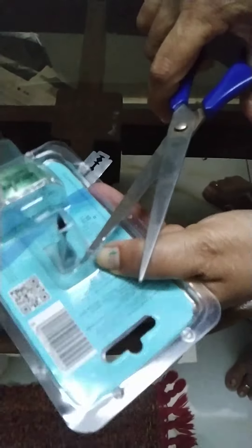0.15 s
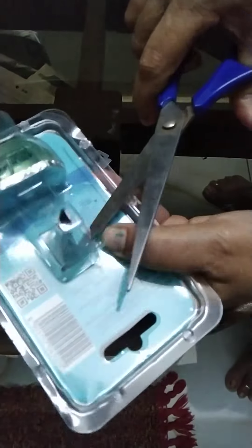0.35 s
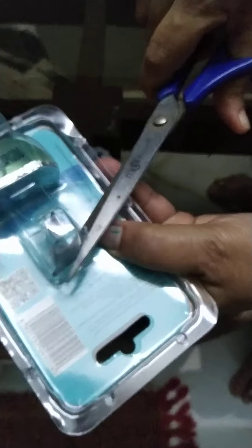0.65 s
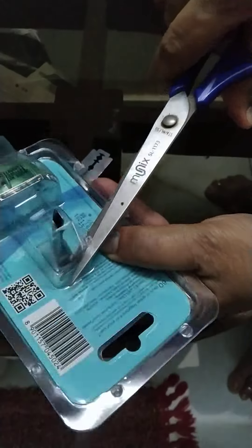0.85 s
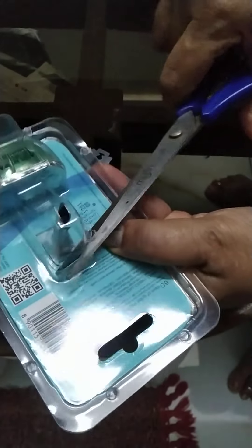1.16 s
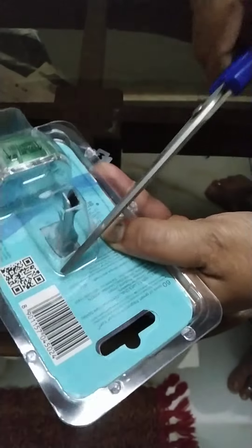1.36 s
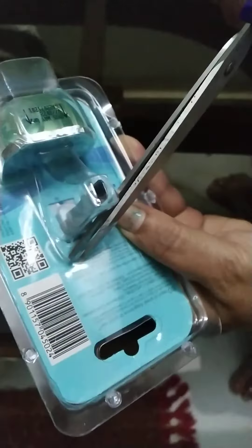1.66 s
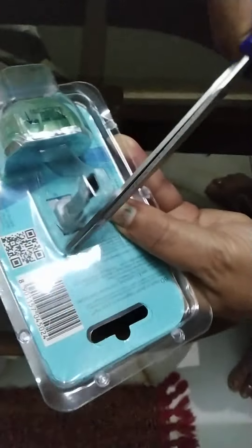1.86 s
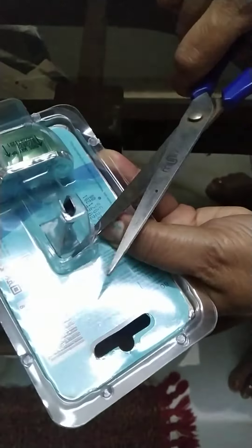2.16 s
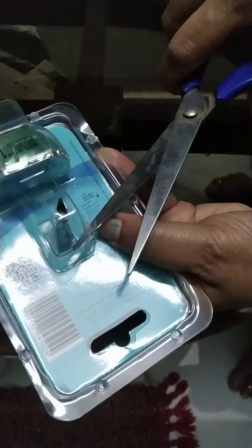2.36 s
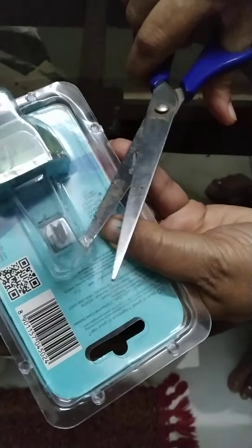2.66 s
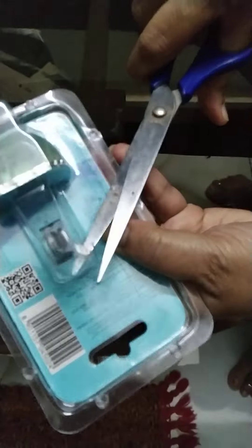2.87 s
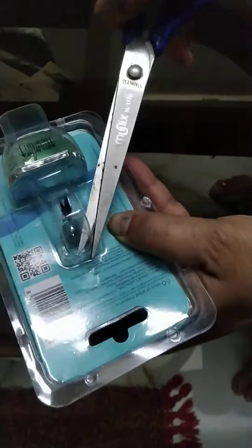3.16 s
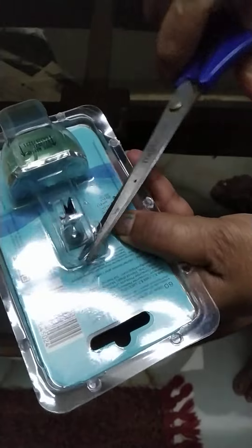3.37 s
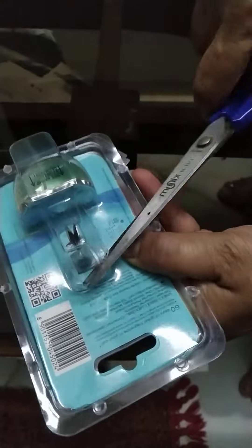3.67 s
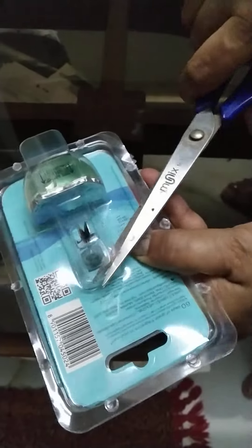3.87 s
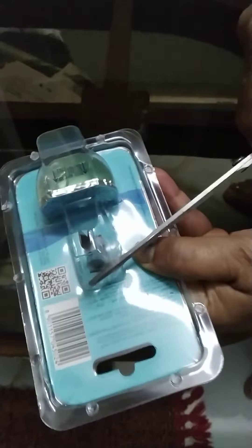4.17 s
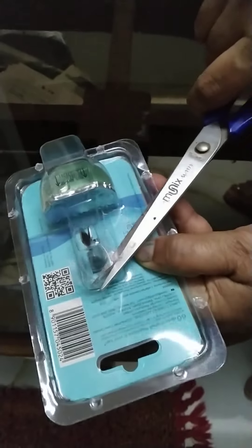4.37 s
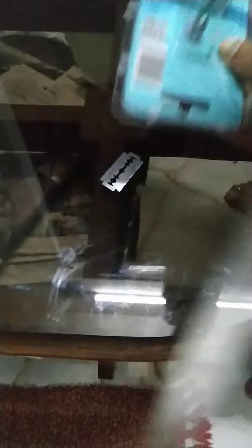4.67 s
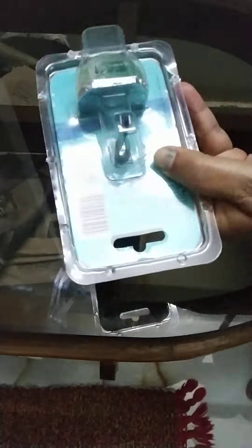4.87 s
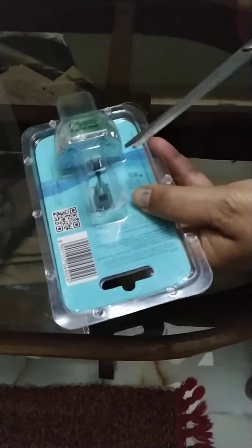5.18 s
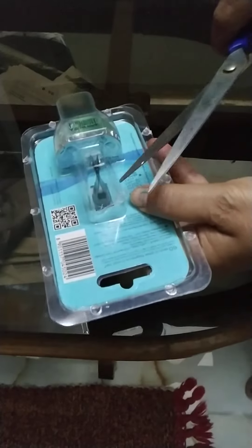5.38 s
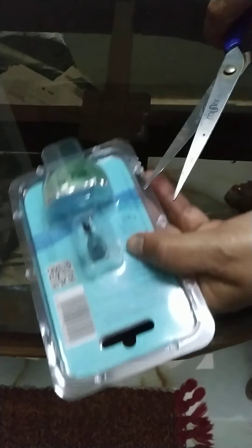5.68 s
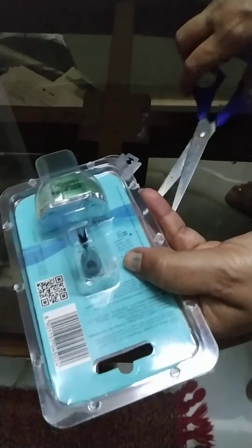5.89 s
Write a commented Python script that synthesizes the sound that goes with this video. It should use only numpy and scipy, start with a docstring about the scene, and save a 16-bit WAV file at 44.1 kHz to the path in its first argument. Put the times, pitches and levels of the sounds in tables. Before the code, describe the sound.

A close microphone in a small room hears airy, gently wavering fan noise, with very faint high cricket shimmer and rapid chirping behind. Low gusts thump and flutter, mostly on the left, notably near 0.4, 1.6, 3.4, 4.3 and 5.0 seconds. Scissors cut stiff plastic: small ticks from 0 to 0.2, stronger cracks and a rasp at 0.35-0.4, then a dense hard burst at 1.14-1.2. A sharp snap comes at 1.65, lighter crackle around 2.1, and a busy run from 2.5 to 2.7. Brittle clusters follow at 3.0, 3.36, 3.75 and 4.0, then crackles and bright tearing at 4.3-4.7. Cutting pauses from about 4.8, leaving fan and draught; faint clicks appear at 5.5 and 5.8. At 5.92-6.02 the scissors land on glass in a loud, fast, bouncing clatter of knocks and thin steel rattle, cut off almost at once.

```python
"""Sharp plastic cracks, rasping tears and a final clatter, over fan noise, buffeting draught and crickets.
Scissors cut the stiff clear shell of a pack: fracture grit rings the modes of shell and card.
At the end the scissors bounce on a glass table: knocks and rattle ring glass and steel.
Behind are wavering fan noise in octave bands, low eddies that buffet two microphone ports,
blurred cricket choruses and one chirping insect."""
import sys
import numpy as np
from scipy import signal
from scipy.fft import rfft, irfft, next_fast_len
from scipy.io import wavfile
from scipy.ndimage import uniform_filter1d

SR = 44100
rng = np.random.default_rng(int(sys.argv[2]) if len(sys.argv) > 2 else 0)


def unload_audio(sound):
    """Save the sound as a 16-bit wav file, at the path given as the first command line argument."""
    columns = np.transpose(np.atleast_2d(sound))
    # keep every value between -1 and 1, then stretch to whole-number steps
    steps = np.round(np.clip(columns, -1, 1) * 32767)
    wavfile.write(sys.argv[1], SR, steps.astype(np.int16))


N = 265920

# Cricket choruses. Each row: centre in Hz, width in Hz, level in dB, left minus right in dB.
CHORUS = [(6500, 1040, -60.5, 2), (7960, 230, -70, -7), (9360, 160, -64.5, -13.5)]
# Fan noise colour. Each row: frequency in Hz, gain in dB.
FAN_COLOUR = [(71, -42), (120, -5), (301, 0.5), (605, -10), (789, -1), (988, -8), (1330, -6.5),
              (1900, -15.5), (5630, -28.5), (6370, -19.5), (7200, -53), (8140, -29), (9210, -13),
              (10200, -35.5), (13600, -32.5), (16000, -78)]
# Likeness of the fan at both ports. Each row: frequency in Hz, likeness from 0 to 1.
FAN_ALIKE = [(130, 1), (290, 0.97), (640, 0.6), (1400, 0.2), (3000, 0)]
# Lowest air modes of the room. Each row: frequency in Hz, width in Hz, relative gain in dB.
HUM_MODES = [(184.7, 17.4, 5), (295.8, 8.1, 7), (344, 42, -3)]
# Gusts and bumps at the ports. Each row: arrival in seconds, left in dB, right in dB.
GUSTS = [(0.436, -26, -50), (0.50, -34, -46), (0.627, -34, -43), (0.689, -31.5, -45), (1.04, -45, -62),
         (1.3, -43, -54), (1.612, -23.5, -54), (1.899, -41, -56), (3.08, -38.5, -58), (3.28, -39.5, -58),
         (3.37, -34.5, -54), (3.432, -27.5, -47), (3.739, -36.5, -48), (3.861, -35, -51), (4.12, -31, -56),
         (4.288, -28.5, -48), (4.36, -29, -40), (4.602, -39.5, -38), (4.84, -38.5, -46),
         (5.046, -24.5, -48), (5.141, -38, -39), (5.258, -45, -34), (5.31, -32, -45), (5.36, -38, -35),
         (5.53, -50, -58), (5.82, -64, -46), (5.949, -40, -37)]
# Scissors landing on glass. Each row: time in seconds, strike in dB before ringing, knock T60 in seconds,
# rattle against knock in dB, rattle T60 in seconds.
DROPS = [(5.9209, -10.5, 0.028, -7.5, 0.13), (5.9699, -5, 0.021, -5.5, 0.15), (5.979, -7, 0.014, -22, .1),
         (5.9907, -1, 0.018, -2, 0.12), (5.9955, -9, 0.015, -17.5, 0.15), (6.02, -16.5, 0.017, -7, 0.18)]
# Blade modes. Each row: frequency in Hz, relative gain in dB, T60 in seconds.
STEEL = [(4210, -1.5, 0.043), (4730, -5, 0.048), (5930, -9, 0.047), (6710, 1.5, 0.041), (9100, 1, .04),
         (10300, 4, 0.034), (10950, -24, 0.081), (12300, -1.5, 0.038), (13200, 0, .05), (14100, -8, 0.028)]
# Table modes. Each row: frequency in Hz, width in Hz, gain in dB.
GLASS = [(162, 42, -2), (486, 310, -4), (1250, 500, -7), (2430, 550, 0), (4000, 1700, -6.5),
         (7640, 3300, 1), (11900, 5400, 0)]
# Blades dragging and tearing in the cut. Each row: start in seconds, end in seconds, ring at start in dB,
# ring at end in dB, brightness in dB.
TEARS = [(0.347, 0.394, -55, -37, -19), (0.397, 0.426, -29.5, -37, -15), (1.153, 1.2, -23, -42, -13),
         (2.069, 2.097, -41, -43, -19), (2.978, 3.003, -36, -41, -10), (3.371, 3.411, -27, -47, -17),
         (4.297, 4.34, -32, -52, -28), (4.355, 4.376, -28, -48, -5), (4.588, 4.609, -35, -24, -4),
         (4.614, 4.649, -22.5, -26, -1.5), (4.659, 4.691, -33, -34.5, -4.5), (5.775, 5.8, -63, -50, -3)]
# Cracks of the shell. Each row: time in seconds, ring level in dB, nominal ring in Hz, brightness in dB,
# fracture decay constant in ms.
CRACKS = [(0.012, -31.5, 2500, -3, 2.4), (0.1142, -32.5, 2360, -6, 1.4), (0.1198, -28.5, 2350, 1.5, 2),
          (0.179, -46.5, 2360, 2, 2.9), (0.1873, -39.5, 2160, -14, 4.2), (0.344, -20, 2020, -13, 2.5),
          (0.3714, -29.5, 2350, -28, 1.8), (0.3858, -34, 2290, -21, 4.3), (0.4025, -26, 1980, -15.5, 2.9),
          (0.4087, -37, 1920, -18, 3.4), (0.493, -38.5, 2190, -42, 3.4), (0.657, -34.5, 2050, 14.5, 1.6),
          (1.1356, -17.5, 2180, -11.5, 2.5), (1.1517, -14, 1900, -13.5, 1.4),
          (1.161, -17.5, 1900, -8.5, 2.7), (1.2094, -18.5, 2320, -10.5, 4.6),
          (1.3413, -42.5, 2320, -5.5, 2.1), (1.4412, -26, 2240, -1.5, 4.2),
          (1.6468, -13.5, 2160, -8.5, 1.7), (1.66, -28.5, 2180, -13, 1.7), (1.7358, -46, 1980, -3, 3.1),
          (1.7864, -30.5, 2100, 6.5, 4.1), (1.8099, -25.5, 2200, -13, 1.75), (2.0454, -53, 2300, 14, 1.6),
          (2.0775, -37, 2040, -12, 8.9), (2.098, -28.5, 2130, -2, 3.3), (2.224, -34.5, 2090, -10, 6.7),
          (2.443, -36, 2430, 7.5, 1.8), (2.473, -54, 2500, 2, 1.5), (2.4905, -50, 2470, 21.5, 1.5),
          (2.517, -27, 2410, -5, 2), (2.5664, -31, 2520, 4, 1.4), (2.595, -27.5, 2550, -2, 2.1),
          (2.631, -20.5, 2170, -7, 4.2), (2.7043, -40, 2130, 11, 2.1), (2.717, -20, 2170, -8, 2.2),
          (2.9802, -38.5, 2300, 7.5, 1.8), (2.993, -38, 2290, 7, 1.5), (2.999, -24, 2260, -11, 1.1),
          (3.007, -29, 2870, 3, 2.4), (3.0108, -15, 2310, -3, 2.1), (3.0259, -35.5, 2310, -4, 7.3),
          (3.3602, -14.5, 2250, -10.5, 2.7), (3.3712, -21, 2420, -15, 1.5), (3.3925, -32, 2440, -14, 1.4),
          (3.426, -37.5, 2320, -12, 3.7), (3.7382, -54, 2210, 10, 1.1), (3.7474, -38.5, 2280, 1, 1.8),
          (3.7604, -24.5, 2160, 5, 2), (3.7787, -19, 2000, -8, 3.5), (3.9836, -42, 2480, -8, 6.1),
          (3.9904, -13.5, 2190, -9, 2.2), (4.0024, -31.5, 1790, -8, 5.7), (4.131, -29, 2190, -42, 1.7),
          (4.179, -44, 2080, -6, 2.4), (4.3013, -25, 2400, -29, 1.5), (4.3227, -33.5, 2110, -9, 4.7),
          (4.3425, -32, 2060, 0, 2.3), (4.357, -21.5, 2086, 0, 0.95), (4.411, -35, 2060, -20, 2.2),
          (4.5745, -43, 2330, 11, 1.7), (4.589, -17.5, 2250, -6.5, 3.4), (4.6095, -17, 2240, -1, 2.4),
          (4.6505, -20, 2440, -2.5, 2.7), (4.6593, -26, 2420, -8, 6.1), (4.806, -45, 1940, 4, 2.1),
          (5.5195, -38, 2170, -12, 1.5), (5.773, -39, 2160, 11, 3), (5.803, -43, 2150, 2, 2.1)]
# Shell and card modes. Each row: nominal frequency in Hz, width in Hz, relative gain in dB.
CARD_MODES = [(390, 170, 9), (590, 250, 14), (880, 340, 8), (1380, 500, 7)]
UPPER_MODES = [(3060, 1270, 1.5), (4540, 590, 6.5), (6360, 1140, -5)]
SIZZLE_MODES = [(8320, 2070, 7.5), (9030, 3140, 6), (13200, 410, -6), (14600, 400, -12.5)]

CHIRP_RATE_HZ, CHIRP_START_S, CHIRP_DB = 11.19, 0.014, -63
FAN_DB, HUM_DB = -43, -53
DRAUGHT_LEFT_DB, DRAUGHT_RIGHT_DB = -48.5, -51
GUST_RISE_DB_S, GUST_HOLD_S = 900, 0.022
# fall of the gust envelope; the small eddies then steepen theirs
GUST_FALL_DB_S, SMALL_EDDIES_FALL_DB_S = 112, 198
THUD_HZ, THUD_WIDTH_HZ, THUD_DB = 105, 70, 51
ROOM_T60_S, ROOM_DB, ROOM_DULL_HZ = 0.34, -15.5, 6730
BLADES_DB, CLATTER_SAMPLES = 4, 16384
# the main ring moves with the length of the cut
RING_WIDTH_HZ, RING_PAIR_SHARE = 560, 0.1
# brightness sets the sizzle in full and the upper modes in part
UPPER_DB, UPPER_SHARE, SIZZLE_DB = 3, 0.54, -1
SIZZLE_TILT = 0.13  # dB per octave for each dB of brightness
# the card follows the crack only in part: base level, share of strength, share of brightness
CARD_DB, CARD_SHARE, CARD_BRIGHT_SHARE = -36, 0.82, 0.28
CRACK_SAMPLES, CRACK_LEAD_SAMPLES, ONSET_SAMPLES = 2048, 15, 220
PORT_HZ, PORT_WIDTH_HZ, PORT_DB = 2300, 1000, 7
PORT_LAG_SAMPLES, NEAR_PAN_DB = 7, 0.5
TOP_HZ = 16400
SIDES = np.array([[0.5], [-0.5]])  # left, right


def undb(db):
    """Decibels to gain."""
    return 10 ** (np.asarray(db) / 20)


def level(x, db, count=None):
    """Scale so that the first count samples have this rms."""
    return x * undb(db) / np.sqrt(np.mean(x[..., :count] ** 2))


def ring(x, modes, twice=False):
    """Excite resonances (Hz, width in Hz, dB); neighbours move in opposite phase."""
    size = next_fast_len(x.shape[-1] + 2048)
    f = np.arange(size // 2 + 1) * SR / size + 1e-3
    power = 2 if twice else 1
    response = 0
    for k, (hz, width_hz, db) in enumerate(modes):
        detune = (f / hz - hz / f) * hz / width_hz
        response = response + (-1) ** k * undb(db) / (1 + 1j * detune) ** power
    return irfft(rfft(x, size) * response, size)[..., :x.shape[-1]]


def colour(x, points):
    """Shape a spectrum by (Hz, dB) points, joined on a log frequency axis."""
    hz, db = np.transpose(points)
    f = np.arange(x.shape[-1] // 2 + 1) * SR / x.shape[-1] + 1
    gain = undb(np.interp(np.log(f), np.log(hz), db))
    return irfft(rfft(x) * gain, x.shape[-1])


def walk(rate_hz):
    """Random levels held 1 / rate_hz seconds and smoothed twice; spread near 1."""
    hold = int(SR / rate_hz)
    steps = np.repeat(rng.standard_normal(N // hold + 1), hold)
    return 1.3 * uniform_filter1d(uniform_filter1d(steps, hold), hold)[:N]


def grit(size, spread_db, alike):
    """Tiny fractures of very uneven size, partly different at the two ports."""
    sizes = undb(spread_db * rng.exponential(size=size))
    shared, own = rng.standard_normal(size), rng.standard_normal((2, size))
    return sizes * (np.sqrt(alike) * shared + np.sqrt(1 - alike) * own)


def crickets():
    """Far choruses blur into narrow bands; one nearer insect chirps with a falling pitch."""
    out = 0
    for hz, width_hz, db, pan_db in CHORUS:
        blur = ring(rng.standard_normal((2, N)), [(hz, width_hz, 0)], twice=True)
        blur = blur * undb(2.6 * walk(47))
        out = out + level(blur, db) * undb(pan_db * SIDES)
    phase = ((np.arange(N) / SR - CHIRP_START_S) * CHIRP_RATE_HZ) % 1
    pitch_hz = 9450 - 1300 * phase + 90 * walk(200)
    swell = np.exp(-((phase - 0.22) / 0.15) ** 2) * undb(2.5 * walk(120))
    chirp = np.sin(2 * np.pi * np.cumsum(pitch_hz) / SR) * swell
    return out + level(chirp, CHIRP_DB) * undb(-3 * SIDES)


def fan():
    """Broad air noise whose octaves waver partly alone; the bass is alike at both ports."""
    out, swell = 0, walk(0.87)
    alike_hz, alike = np.transpose(FAN_ALIKE)
    for hz in 130 * 2 ** np.arange(8):
        likeness = np.interp(np.log(hz), np.log(alike_hz), alike)
        mid, side = rng.standard_normal((2, N))
        pair = np.sqrt(1 + likeness) * mid + np.sqrt(1 - likeness) * side * np.sign(SIDES)
        band = [(hz / 2, -40), (hz / 1.6, -6), (hz, 0), (hz * 1.6, -6), (hz * 2, -40)]
        out = out + colour(pair, band) * undb(0.5 * swell + 0.89 * walk(11))
    # the room's lowest air modes lift narrow bands
    hum = level(ring(out, HUM_MODES, twice=True), HUM_DB)
    air = level(colour(out, FAN_COLOUR), FAN_DB)
    return (air + hum) * undb(2.5 * SIDES)


def gusts(fall_db_s):
    """Draught strength at each port: gusts rise fast, hold and die away over a steady floor."""
    t = np.arange(0, N, 64) / SR
    gain = undb([[DRAUGHT_LEFT_DB], [DRAUGHT_RIGHT_DB]]) * np.ones(len(t))
    for arrival_s, left_db, right_db in GUSTS:
        rise_db = GUST_RISE_DB_S * np.minimum(t - arrival_s, 0)
        fall_db = fall_db_s * np.maximum(t - arrival_s - GUST_HOLD_S, 0)
        gain = np.hypot(gain, undb([[left_db], [right_db]]) * undb(rise_db - fall_db))
    return np.repeat(gain, 64, axis=1)[:, :N]


def draught():
    """Eddies thump each port on its own; a gust opens with a thud and carries smaller, higher eddies."""
    fronts = np.zeros((2, N))
    for arrival_s, left_db, right_db in GUSTS:
        fronts[:, int(arrival_s * SR)] = undb([left_db, right_db])
    out = ring(fronts, [(THUD_HZ, THUD_WIDTH_HZ, THUD_DB)], twice=True)
    large = [(25, -29), (50, 1.5), (80, 4.5), (120, -8.5), (250, -43), (1500, -87)]
    small = [(50, -70), (100, -5.5), (170, -3), (280, -16), (1500, -76)]
    for points, base_db, exponent, fall_db_s in (
            (large, 0, 1, GUST_FALL_DB_S), (small, 5, 1.33, SMALL_EDDIES_FALL_DB_S)):
        eddies = colour(rng.standard_normal((2, N)), points)
        # a stream of eddies is steadier than noise
        eddies = eddies / np.sqrt(uniform_filter1d(eddies ** 2, size=5000, axis=1))
        strength = uniform_filter1d(gusts(fall_db_s), size=128, axis=1)
        out = out + eddies * undb(base_db) * strength ** exponent
    return out


def room(x):
    """A small room: a decaying, low-passed noise tail, unrelated at the two ports."""
    t = np.arange(int(0.4 * SR)) / SR
    tail = rng.standard_normal((2, len(t))) * undb(-60 * t / ROOM_T60_S) * (t > 0.006)
    tail = signal.lfilter(*signal.butter(2, ROOM_DULL_HZ, fs=SR), tail)
    tail = tail / np.sqrt(np.sum(tail ** 2, axis=1, keepdims=True))
    far = x.mean(axis=0, keepdims=True)
    # the strong modes beam towards the ports, so the walls get less of them
    far = far - 0.5 * ring(far, [(2370, 1100, 0)])
    far = far - 0.4 * ring(far, [(4400, 850, 0)])
    return undb(ROOM_DB) * signal.fftconvolve(far, tail, axes=1)[:, :N]


def clatter():
    """Steel bounces on glass: knocks, a dense rattle and the thin ring of the blades."""
    t = (np.arange(CLATTER_SAMPLES) + N - CLATTER_SAMPLES) / SR
    knock_grit = level(grit(CLATTER_SAMPLES, 1.5, 0.5), 0)
    rattle_grit = level(grit(CLATTER_SAMPLES, 3.0, 0.2), 0)
    hits = 0
    for time_s, db, knock_t60_s, rattle_db, rattle_t60_s in DROPS:
        age = np.maximum(t - time_s, 0)
        knock = knock_grit * undb(-60 * age / knock_t60_s)
        rattle = rattle_grit * undb(rattle_db - 60 * age / rattle_t60_s)
        hits = hits + (age > 0) * undb(db) * (knock + rattle)
    # a mode's width follows from its T60
    blades = [(hz, np.log(1000) / np.pi / t60_s, db) for hz, db, t60_s in STEEL]
    sound = ring(hits, GLASS) + undb(BLADES_DB) * ring(hits, blades)
    return np.pad(sound, ((0, 0), (N - CLATTER_SAMPLES, 0)))


def main_ring(hz):
    """A close pair of modes that beat, over a lower flap of the cut edge."""
    flap = (hz * 0.72, 600, -7)
    lower = (hz * (1 - RING_PAIR_SHARE), RING_WIDTH_HZ, -3)
    upper = (hz * (1 + RING_PAIR_SHARE / 2), RING_WIDTH_HZ, 0)
    return [flap, lower, upper]


def overtones(bright_db):
    """Levels in dB of upper modes and sizzle against the main ring."""
    return UPPER_DB + UPPER_SHARE * bright_db, SIZZLE_DB + bright_db


def tears():
    """Stick-slip grit in uneven steps, fed into the same modes as the cracks."""
    slip = grit(N, 3.0, 0.6) * undb(2.5 * walk(350))
    t, gains = np.arange(N) / SR, np.zeros((4, N))
    for start_s, end_s, start_db, end_db, bright_db in TEARS:
        drag = undb(np.interp(t, [start_s, end_s], [start_db, end_db])) * (t > start_s) * (t < end_s)
        parts_db = [0, *overtones(bright_db), -6 + CARD_BRIGHT_SHARE * bright_db]
        gains += drag * undb(parts_db)[:, None]
    gains = uniform_filter1d(gains, size=90, axis=1)
    mode_sets = (main_ring(2040), UPPER_MODES, SIZZLE_MODES, CARD_MODES)
    return sum(level(ring(slip, modes), 0) * gain for modes, gain in zip(mode_sets, gains))


def cracks():
    """Each crack is a run of fractures a few ms long that rings shell and card."""
    out, t = np.zeros((2, N + CRACK_SAMPLES)), np.arange(CRACK_SAMPLES) / SR
    for time_s, db, hz, bright_db, decay_ms in CRACKS:
        envelope = np.exp(-1000 * t / decay_ms) * np.minimum(t / 0.00056, 1)
        burst = grit(CRACK_SAMPLES, 2.5, 0.41) * envelope
        # the grip bends the shell anew each time, which shifts its modes
        bend = 1 + 0.04 * rng.standard_normal()
        sound = level(ring(burst, main_ring(hz), twice=True), db, ONSET_SAMPLES)
        # the first fractures are the sharpest
        front = burst * np.exp(-t / 0.019)
        upper_db, sizzle_db = overtones(bright_db)
        tilt = SIZZLE_TILT * bright_db
        sizzle = [(f, width, gain + tilt * np.log2(f / 9000)) for f, width, gain in SIZZLE_MODES]
        card_db = CARD_DB + CARD_SHARE * (db + 27.5) + CARD_BRIGHT_SHARE * bright_db
        parts = ((UPPER_MODES, db + upper_db), (sizzle, db + sizzle_db), (CARD_MODES, card_db))
        for modes, part_db in parts:
            bent = [(f * bend, width, gain) for f, width, gain in modes]
            sound = sound + level(ring(front, bent), part_db, ONSET_SAMPLES)
        at = int(time_s * SR) - CRACK_LEAD_SAMPLES
        out[:, at:at + CRACK_SAMPLES] += sound
    return out[:, :N]


def scene():
    """Near sounds reach the right port first; room, fan, draught and crickets lie behind."""
    near = cracks() + tears() + clatter()
    direct = np.array([np.roll(near[0], PORT_LAG_SAMPLES), near[1]]) * undb(NEAR_PAN_DB * SIDES)
    return direct + room(near) + fan() + draught() + crickets()


def record(dry):
    """The left port has a cavity resonance; peaks are rounded and the top is cut."""
    cavity = ring(dry[0], [(PORT_HZ, PORT_WIDTH_HZ, 0)])
    left = dry[0] + (undb(PORT_DB) - 1) * cavity
    both = np.tanh(1.066 * np.array([left, dry[1]])) / 0.97
    low_pass = signal.ellip(10, 0.2, 80, TOP_HZ, fs=SR, output="sos")
    return signal.sosfilt(low_pass, both)


dry = scene()
out = record(dry)
unload_audio(out)
```